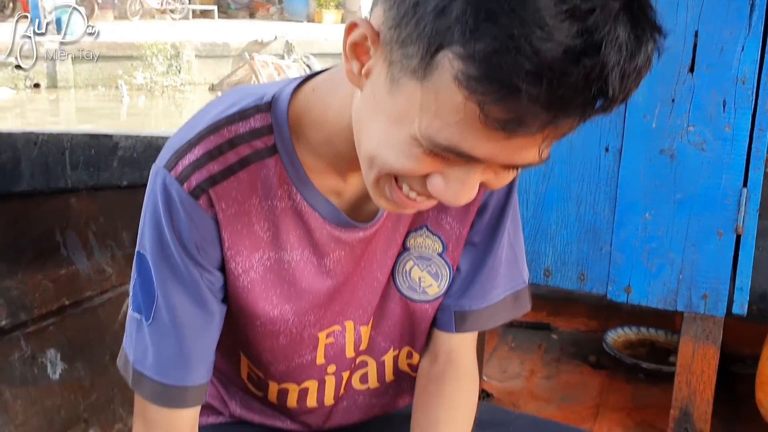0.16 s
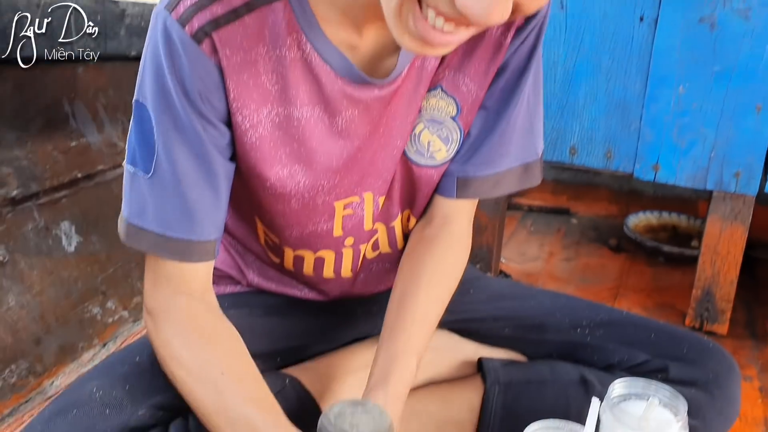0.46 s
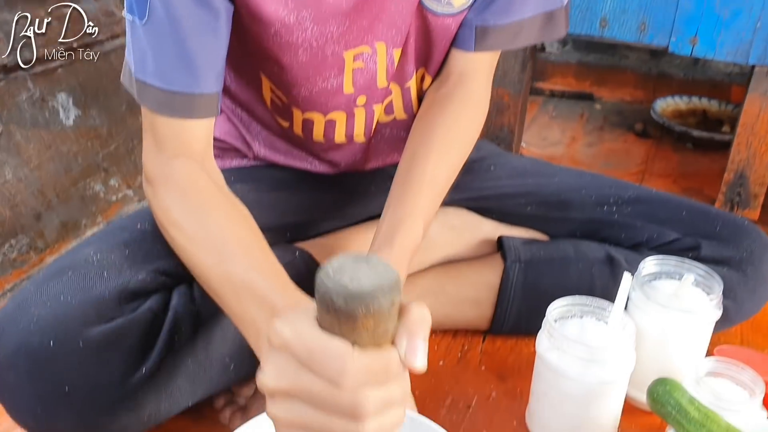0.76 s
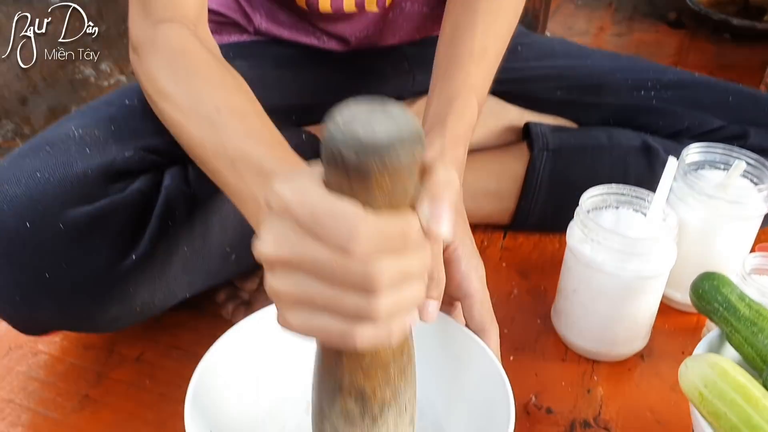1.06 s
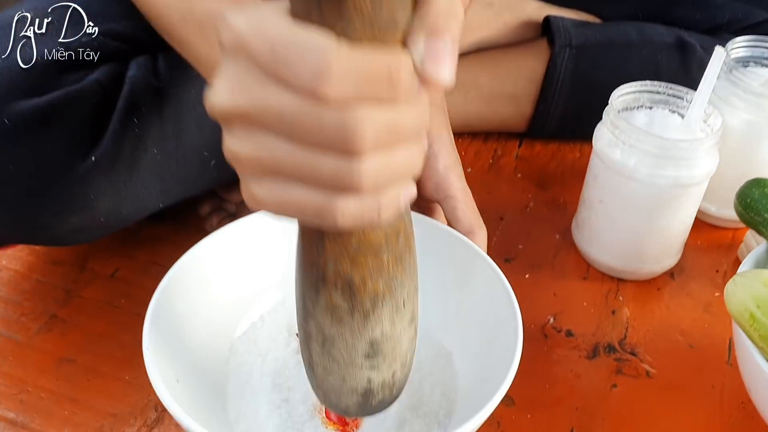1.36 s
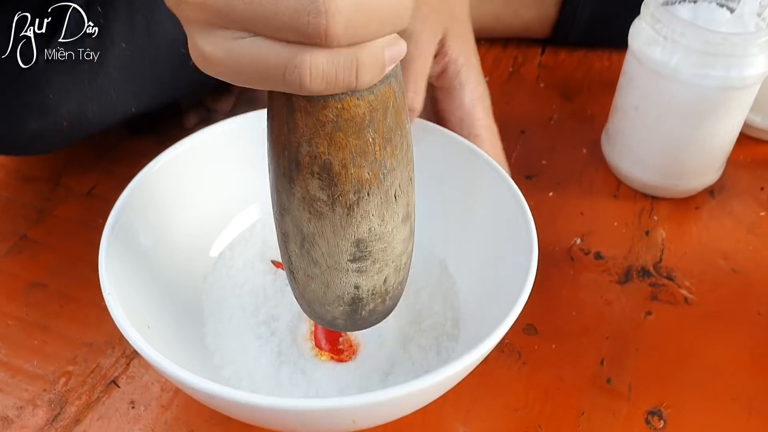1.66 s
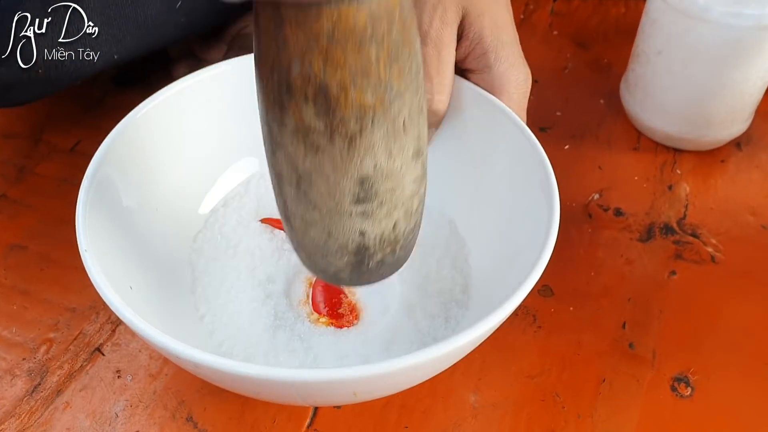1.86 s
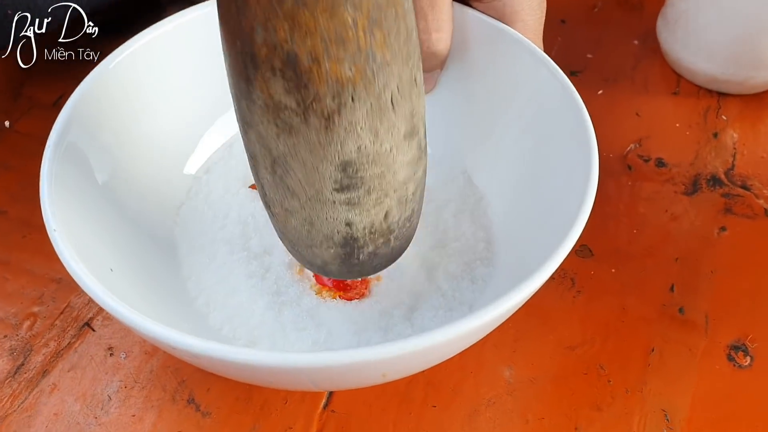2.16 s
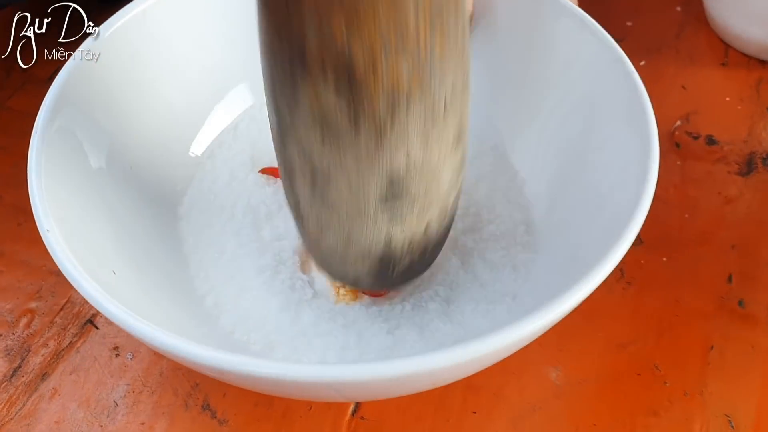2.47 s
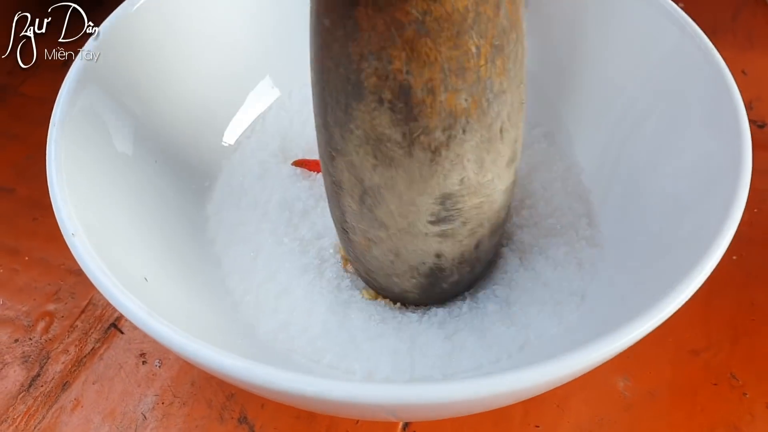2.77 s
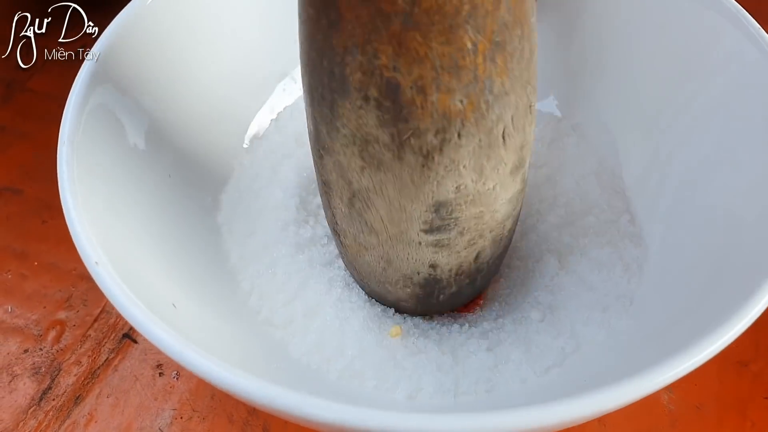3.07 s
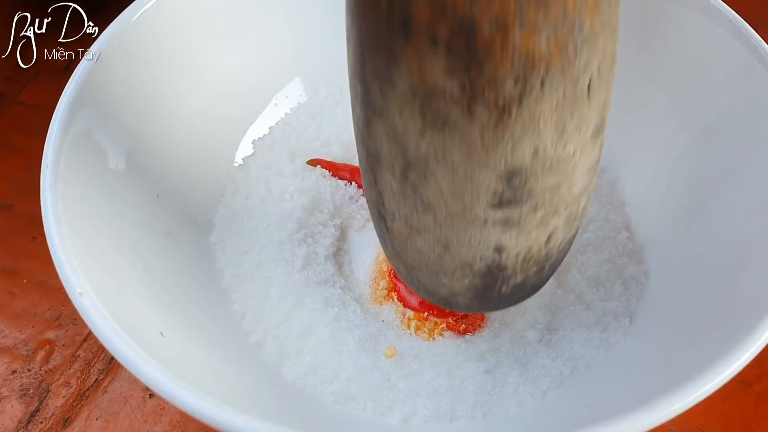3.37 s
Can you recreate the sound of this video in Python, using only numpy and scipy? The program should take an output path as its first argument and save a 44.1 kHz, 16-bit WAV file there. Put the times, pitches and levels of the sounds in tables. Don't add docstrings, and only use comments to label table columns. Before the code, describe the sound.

A wooden pestle pounds coarse salt in a ceramic bowl on a boat deck. After a brief low slide of salt, a blow lands at 0.16 s, a weak tap at 0.35, then hard, boomy knocks from 0.47 about every quarter second to 3.3. Planks rattle, salt crunches faintly; the bowl rings clearest after 0.72 and 1.0. Quiet open air and distant engine hum, close stereo.

```python
import sys
import numpy as np
from scipy import signal
from scipy.fft import rfft, irfft, next_fast_len
from scipy.io import wavfile
from scipy.ndimage import uniform_filter1d, minimum_filter1d

SR = 44100
rng = np.random.default_rng(int(sys.argv[2]) if len(sys.argv) > 2 else 0)


def waveform_to_disk(signal):
    frames = np.transpose(np.atleast_2d(signal))
    scaled = np.clip(frames, -1, 1) * 32767
    samples = np.round(scaled).astype(np.int16)
    wavfile.write(sys.argv[1], SR, samples)


def elevation(decibels):
    levels = np.asarray(decibels, float)
    return 10 ** (levels / 20)


N = 154350

BLOWS = [(0.1626, -4, -5.5, -36.5, -41.5), (0.3498, -24, -15.5, -55, -65.5),
         (0.465, -0.5, -11, -34.5, -44.5), (0.7176, -1, -11, -35.5, -48.5), (0.9985, 1, -9.5, -39.5, -60),
         (1.251, -3, -7, -32, -53), (1.5018, -2, -8.5, -36, -56), (1.7519, 0, -12.5, -37.5, -47.5),
         (2.0079, -5, -10, -31, -44), (2.2619, -3, -8.5, -36.5, -40), (2.5127, -3.5, -8, -33.5, -49),
         (2.7925, -2, -8.5, -37, -44.5), (3.0356, -2.5, -11, -38, -42.5), (3.277, -2.5, -6.5, -33.5, -49)]
# frequency in Hz, level in dB, T60 in seconds.
PLANKS = [(297.4, -12, 0.37), (355.4, -6, 0.18), (372.8, -2.5, 0.11), (449, 2, 0.19), (483, -5.5, 0.22),
          (543, -12, 0.14), (587, -10.5, 0.11), (743.5, -3.5, 0.11)]
# frequency in Hz, side level in dB re mid.
WIDTH = [(60, -46.5), (150, -14.5), (400, -14.5), (1500, 0.5), (3000, 0.5), (8000, -2)]


def curve(table, hz):
    points = np.maximum(np.array(table, float), [1, -200])
    return np.interp(np.log(np.maximum(hz, 1)), np.log(points[:, 0]), points[:, 1])


def walk(rate_hz):
    k = int(SR / rate_hz)
    steps = np.repeat(rng.standard_normal(N // k + 1), k)
    return 1.6 * uniform_filter1d(uniform_filter1d(steps, k), k)[:N]


def patches(count, size):
    ripple = uniform_filter1d(uniform_filter1d(rng.standard_normal(count), size=size), size=size)
    return ripple / ripple.std()


def wide(noise):
    z, hz = rfft(noise), np.fft.rfftfreq(noise.shape[-1], 1 / SR)
    mid = z[..., 0, :]
    side = z[..., 1, :] * elevation(curve(WIDTH, hz))
    return np.stack([mid + side, mid - side], -2), hz


def band(hz, centre_hz, octaves):
    offset = np.log2(np.maximum(hz, 1) / centre_hz) / octaves
    return np.cos(np.pi / 2 * np.clip(offset, -1, 1))


def add(out, start_s, x):
    i = max(int(start_s * SR), 0)
    out[:, i:i + x.shape[1]] += x[:, :N - i]


def ring(modes, rise_s, t, chance, lean, peak_s=None):
    hz, db, t60_s = np.array(modes, float).T[:, :, None]
    count = len(hz)
    hz = hz * (1 + 0.017 * chance[:count, :1])
    cycles = hz * t if peak_s is None else hz * (t - peak_s) + 1 / 4
    phase = 2 * np.pi * cycles
    tilt = np.arctan(elevation(curve(WIDTH, hz))) * lean[:count, None]
    env = elevation(db + 3.5 * chance[:count, 1:] - 60 * t / t60_s) * (1 - np.exp(-t / rise_s))
    return np.array([(env * np.sin(phase + tilt)).sum(0), (env * np.sin(phase - tilt)).sum(0)])


def struck_modes(t, late, lean, knock_db, peak_s):
    # frequency in Hz, level in dB, T60 in seconds.
    hull_modes = [(108, -9, 0.062), (106, 2, 0.26), (164.2, -8, 0.31), (246.9, -12, 0.23)]
    pestle_modes = [(941.6, 1.5, 0.082), (1010, 4, 0.021), (1178, 10, 0.036), (1319, -6.5, 0.11),
                    (1416, 1.5, 0.043), (1755, -15, 0.14), (2110, -7, 0.068), (2790, -33.5, 0.13)]
    snap_modes = [(179, -8.5, 0.11), (501, -1, 0.066), (1019, -7.5, 0.017), (1620, -9, 0.0034),
                  (1928, -14, 0.02)]
    chance = rng.standard_normal((5, 14, 2))
    hull_rise_s = 0.0099
    hull = ring(hull_modes, hull_rise_s, late, 0.74 * chance[0], lean[0])
    hull *= 1 - np.exp(-late / hull_rise_s)
    plank_lean = lean[1] * (2.2 + 0.4 * chance[0, :, 0])
    planks = ring(PLANKS, 0.0022, late, chance[1], plank_lean)
    pestle_lean = lean[2] + 0.13 * chance[0, :, 1]
    pestle_peak_s = peak_s + 0.00015 * chance[4, :len(pestle_modes), :1]
    pestle = ring(pestle_modes, 0.0015, late, chance[2], pestle_lean, pestle_peak_s)
    snap = ring(snap_modes, 0.00045, late, 0.5 * chance[3], 0.85 * lean[1], peak_s)
    x = elevation(-8.5) * hull - elevation(-14) * planks
    return x + elevation(-10.5 + knock_db) * pestle + elevation(1 + knock_db / 2) * snap


def rattle(t, late, same, knock_db):
    # frequency in Hz, level in dB.
    levels = [(41, -9), (70, 1.5), (113, -3.5), (220, -6), (366, -2), (638, -6.5), (930, -7), (1850, -26.5),
              (3500, -30), (4550, -63.5), (7700, -120)]
    # frequency in Hz, T60 in seconds.
    decay = [(60, 0.12), (160, 0.28), (420, 0.23), (1100, 0.15), (2000, 0.12), (3500, 0.12)]
    new_share, rise_cycles = 0.42, 1.87
    fresh = rng.standard_normal(same.shape)
    z, hz = wide(np.sqrt(1 - new_share) * same + np.sqrt(new_share) * fresh)
    treble = np.clip(np.log2(np.maximum(hz, 1) / 500), 0, 1)
    z = z * elevation(curve(levels, hz) + 36 + treble * (knock_db + 10))
    z = z * elevation(3 * patches(count=len(hz), size=8) - 2)
    x = np.zeros(same.shape)
    for centre_hz in 80 * 2 ** np.arange(0, 5.6, 0.5):
        rise = 0.25 + 0.72 * (1 - np.exp(-late * centre_hz / rise_cycles)) ** 2
        env = elevation(-29 - 60 * t / curve(decay, centre_hz)) * rise
        x += env * irfft(z * band(hz, centre_hz, 0.52), len(t))
    return x


def glaze_click(late, hz, glaze_hz, click_db):
    burst = rng.standard_normal((2, len(late))) * (1 - np.exp(-late / 0.00059))
    burst *= elevation(click_db + 14.5 - 60 * late / 0.016)
    return irfft(rfft(burst) * band(hz, glaze_hz, 0.21), len(late))


def crushed_salt(t, late, lean, salt_db, fine_db):
    # frequency in Hz, level in dB.
    colour = [(1760, -1), (3000, -15), (4810, -6.5), (5310, -11), (6900, -8.5), (7950, -27.5), (11600, -21),
              (15200, -25.5), (16200, -29.5)]
    # frequency in Hz, level in dB, T60 in seconds.
    ceramic_modes = [(5000, -15, 0.013), (6330, 7.5, 0.013), (7050, -1, 0.03), (8700, -8, 0.043),
                     (10000, -10, 0.024), (11400, -8.5, .04)]
    n = len(t)
    grains = elevation(3 * np.abs(uniform_filter1d(rng.standard_normal(n), size=40)) * 8)
    mid, side = rng.standard_normal((2, n))
    near = np.array([mid, 0.4 * side + np.roll(mid, shift=3) - np.roll(mid, shift=-3)])
    crumble = elevation(3.5 - 60 * t / 0.1)
    crack = elevation(10 - 60 * late / 0.015)
    z, hz = wide(near * grains * (crumble + crack) * (1 - np.exp(-t / 0.003)) ** 2)
    z = z * elevation(2 + curve(colour, hz) + 4 * patches(count=len(hz), size=60) + 0.5)
    z = z * np.clip(hz / 3000, 0, 1) ** 2
    chance = rng.standard_normal((14, 2))
    z += elevation(-10.5) * rfft(ring(ceramic_modes, 0.0007, late, 1.8 * chance, lean) * grains)
    return irfft(z * elevation(np.where(hz > 7800, fine_db + 11, salt_db)), n)


def blows():
    # planks near 500 Hz in dB, planks near 360 Hz in dB,
    # hard edge near 2 kHz in dB, hull near 165 Hz in dB, wood near 1 kHz in dB.
    spots = [(-2, 7.5, 3.5, -2.5, -0.5), (4.5, 8, -5, -1, 4.5), (-6.5, 6.5, -11.5, 1, -6.5),
             (-5, 7, 8, -4.5, 1), (-7, -1, 7, -6, 2), (-6.5, 0, 9.5, -4, 2.5), (-2, 1, 4, 0.5, -0.5),
             (-1, -1, -1, -1.5, 0.5), (0.5, 3.5, 16, 2.5, 3.5), (2, 1, -3, 2.5, -4.5),
             (-0.5, -0.5, 5, -2.5, 0.5), (3, -2, -2.5, 1, -3.5), (2.5, 0, -3.5, -2, -2.5),
             (2.5, -2, 1.5, -1, -1.5)]
    # wood knock in Hz, its level in dB re thud,
    # glaze click in Hz, its level in dB re thud.
    contacts = [(1100, -3.5, 5600, -42.5), (910, -28, 4000, -46), (925, -30, 3000, -32.5),
                (1000, -9, 7800, -39), (1335, -4, 1200, -28.5), (1400, -1.5, 7000, -27.5),
                (1300, -2, 3700, -32), (1350, -3, 7060, -35), (1200, -4.5, 2400, -29.5),
                (1050, -5.5, 6310, -20), (1000, 1, 5300, -27.5), (970, -1, 4700, -29),
                (1040, 0.5, 5750, -34), (1008, 2, 6560, -28)]
    out, n = np.zeros((2, N)), 16384
    t, hz = np.arange(n) / SR, np.fft.rfftfreq(n, 1 / SR)
    late = np.maximum(t - 0.0022, 0)
    lead_s, peak_s = 0.002, 0.000977
    lean = rng.choice([-1., 1.], size=(3, 14))
    lean[1, :6] = 1
    same = rng.standard_normal((2, n))
    wood_top = 0.25 + 0.75 / (1 + (hz / 2600) ** 10)
    fade = np.clip((t[-1] - t) / 0.1, 0, 1) * np.clip(t / 0.001, 0, 1)
    for blow, spot, contact in zip(BLOWS, spots, contacts):
        start_s, thud_db, knock_db, salt_db, fine_db = blow
        high_db, low_db, edge_db, hull_db, wood_db = spot
        wood_hz, hit_db, glaze_hz, click_db = contact
        body = struck_modes(t, late, lean, knock_db, peak_s) + rattle(t, late, same, knock_db)
        spot_db = high_db * band(hz, 510, 0.37) + low_db * band(hz, 350, 0.43)
        spot_db += edge_db * band(hz, 2000, 0.65)
        spot_db += hull_db * band(hz, 165, 0.45) + wood_db * band(hz, 920, 1.0)
        knock = ring([(wood_hz, hit_db, 0.016)], 0.00027, late, np.zeros((1, 2)), np.array([0.3]), peak_s)
        x = irfft((rfft(body) * elevation(spot_db) + rfft(knock)) * wood_top, n)
        x += glaze_click(late, hz, glaze_hz, click_db)
        x += crushed_salt(t, late, lean[0], salt_db, fine_db)
        add(out, start_s - lead_s, elevation(thud_db) * x * fade)
    return out


def bowl():
    # start in seconds, level in dB, free time in seconds until damped, upper mode in dB.
    rings = [
        (0, -44.5, 0.031, 6),
        (.718, -29, 0.38, -2),
        (.997, -29, 0.11, -4.5),
        (1.251, -50.5, 0.17, 17),
        (1.501, -45, 0.15, -6),
        (1.751, -21.5, 0.04, -14),
        (2.008, -40, 0.083, -7),
        (2.793, -57, .15, 2),
        (3.276, -34, 0.1, 7),
    ]
    # frequency in Hz, level in dB, T60 in seconds.
    bowl_modes = [(712, 0, 1.1), (1697, -26, .8), (498, -14, .6)]
    out, t = np.zeros((2, N)), np.arange(SR // 2) / SR
    lean = np.array([1., -1., 1.])
    for start_s, db, free_s, upper_db in rings:
        modes = np.array(bowl_modes, float)
        modes[1, 1] += upper_db
        damping = elevation(db - 160 * np.maximum(t - free_s, 0))
        add(out, start_s, damping * ring(modes, 0.0079, t, 0.29 * rng.standard_normal((3, 2)), lean))
    return out


def scrapes():
    # start in seconds, length in seconds, centre in Hz.
    slides = [(0, .075, 300), (.02, .1, 2200), (.64, .075, 1000), (.89, .025, 1000), (1.07, .11, 4800),
              (1.08, .1, 1800), (1.19, .04, 1600), (1.603, .025, 1300), (1.603, .025, 5500),
              (2.55, .012, 6000), (2.385, .016, 3800), (.37, .05, 900), (1.34, .09, 1000), (2.13, .05, 800),
              (1.08, .1, 12000), (2.64, .09, 700)]
    slides_db = [-25, -50, -39.5, -54, -58, -47.5, -46.5, -40.5, -58, -54.5, -66, -48, -47, -48, -71, -46.5]
    out, n = np.zeros((2, N)), 8192
    t = np.arange(n) / SR
    for (start_s, length_s, centre_hz), db in zip(slides, slides_db):
        grit = rng.standard_normal((2, n)) * elevation(1.2 * rng.exponential(size=n // 64).repeat(64))
        z, hz = wide(grit * np.sin(np.pi * np.clip(t / length_s, 0, 1) ** 0.5))
        colour = band(hz, centre_hz, 1) + 0.029 * band(hz, 5500, 0.87)
        add(out, start_s, elevation(db) * irfft(z * colour, n))
    return out


def creak():
    # multiple of the fundamental, level in dB.
    overtones = [(1, 0), (3, -14), (5, -19), (7, -24), (9, -26), (11, -19)]
    out, n = np.zeros((2, N)), 8192
    start_s, length_s, pitch_hz = 0.632, 0.078, 184
    phase = 2 * np.pi * np.cumsum(pitch_hz * (1 + 0.012 * walk(320)[:n])) / SR
    tone = sum(elevation(db + 4 * walk(120)[:n]) * np.sin(k * phase) for k, db in overtones)
    swell = np.sqrt(np.sin(np.pi * np.clip(np.arange(n) / SR / length_s, 0, 0.999)))
    add(out, start_s, elevation(-39) * tone * swell * np.ones((2, 1)))
    return out


def river():
    # frequency in Hz, level in dB.
    air_colour = [(25, -8.5), (50, -5), (130, 2.5), (500, -19.5), (1100, -30), (2500, -39.5), (7000, -38),
                  (8000, -56), (16000, -71)]
    # time in seconds, deck grumble in dB.
    shifting = [
        (0.0, -47),
        (0.27, -46),
        (3.5, -68.5),
    ]
    # time in seconds, engine level in dB.
    engine_course = [
        (0, -43.5),
        (.55, -36),
        (.9, -40.5),
        (1.3, -41.5),
        (2.001, -43),
        (2.6, -45.5),
        (3.5, -43.5),
    ]
    t = np.arange(N) / SR
    z, hz = wide(rng.standard_normal((2, 2, N)))
    air_z = z[0] * elevation(curve(air_colour, hz))
    air = np.zeros((2, N))
    for centre_hz in 32 * 2. ** np.arange(10):
        air += elevation(1.5 * walk(17)) * irfft(air_z * band(hz, centre_hz, 0.38), N)
    resonance = sum(elevation(db) / (1 + 2j * (hz - mode_hz) / 30) for mode_hz, db, _ in PLANKS)
    deck = irfft(z[1] * resonance, N)
    deck *= elevation(np.interp(t, *np.array(shifting).T) + walk(4.7)) / deck.std()
    engine = irfft(z[0, 0] / (1 + ((hz - 50.5) / 8) ** 4), N)
    engine *= elevation(np.interp(t, *np.array(engine_course).T)) / engine.std()
    return elevation(-49) * air / air.std() + deck + engine


def background_lift():
    since_s = np.arange(N) / SR - np.array(BLOWS)[:, :1]
    recovery = np.where(since_s > 0, np.exp(-np.abs(since_s) / 0.067), 0)
    return elevation(2.5 * recovery.max(0))


def scene():
    return blows() + bowl() + scrapes() + creak() + river() * background_lift()


def low_pass(x):
    return signal.sosfilt(signal.butter(12, 16360, fs=SR, output="sos"), x)


def record(dry):
    # frequency in Hz, left minus right in dB.
    ports = [(60, 0.5), (700, -0.5), (1400, -1.5), (2400, -3), (5000, -3), (12000, 0)]
    top_hz, ceiling = 15900, 0.99
    n = next_fast_len(N + SR // 10)
    hz = np.fft.rfftfreq(n, 1 / SR)
    tilt_db = curve(ports, hz) / 2
    response = elevation(np.array([tilt_db, -tilt_db])) / (1 + (hz / top_hz) ** 40)
    padded = np.pad(dry, ((0, 0), (0, n - N)), mode="linear_ramp")
    x = irfft(rfft(padded) * response, n)[:, :N]
    gain = minimum_filter1d(ceiling / np.maximum(np.abs(x).max(0), ceiling), size=41)
    return low_pass(np.clip(x * uniform_filter1d(gain, size=41), -1, 1))


dry = scene()
out = record(dry)
waveform_to_disk(out)
```